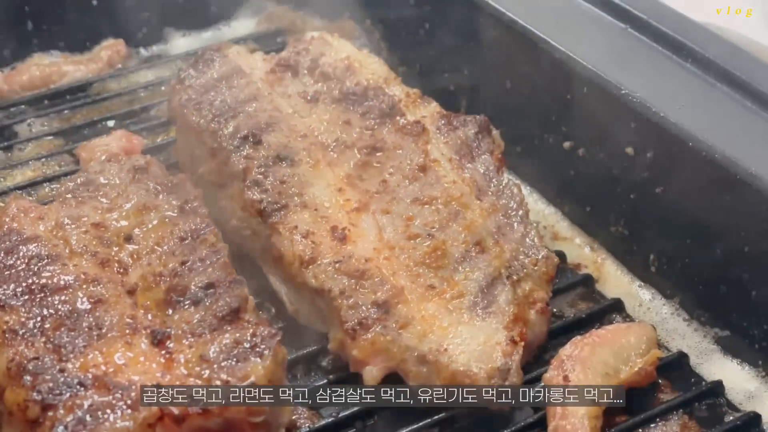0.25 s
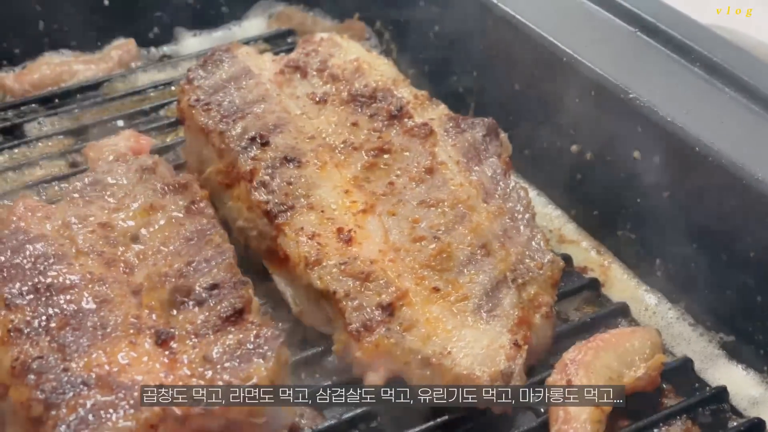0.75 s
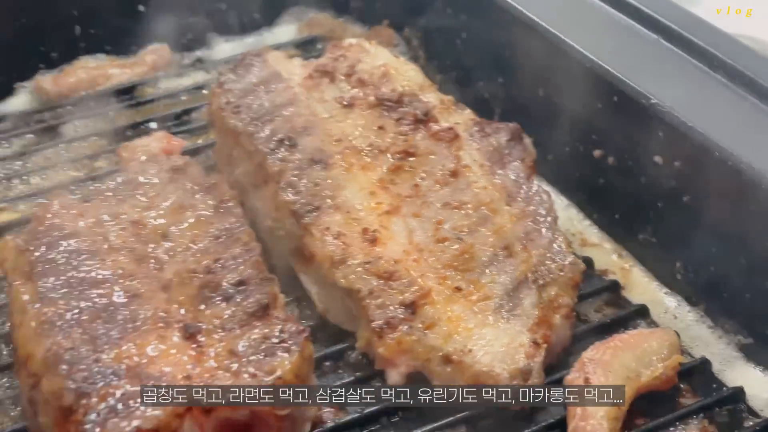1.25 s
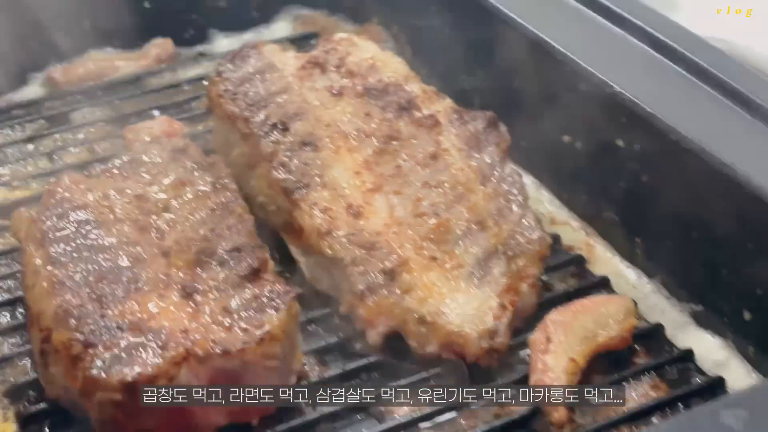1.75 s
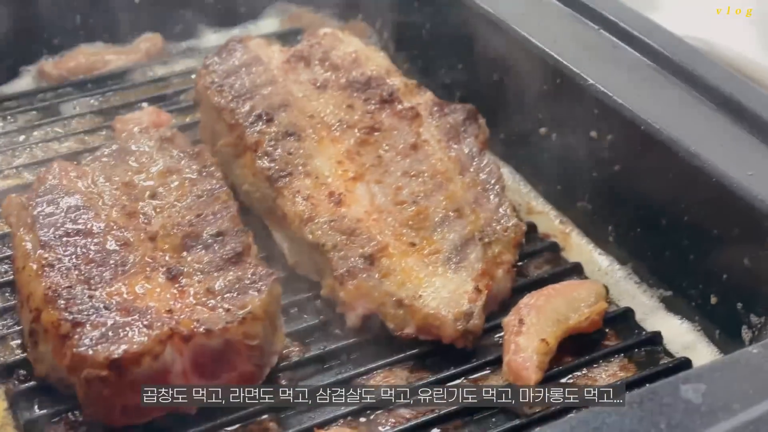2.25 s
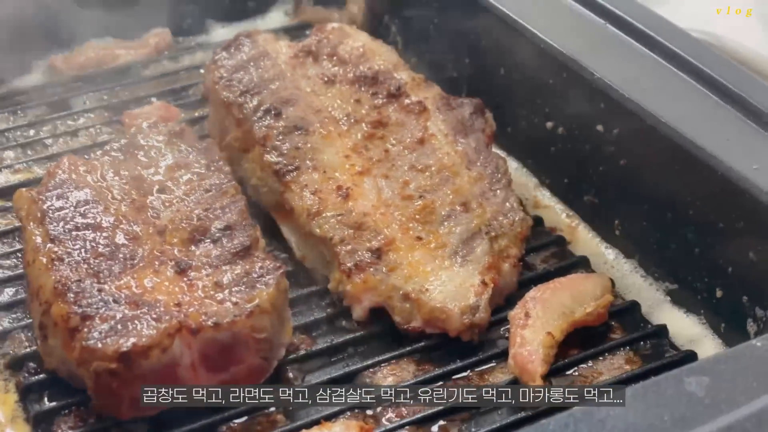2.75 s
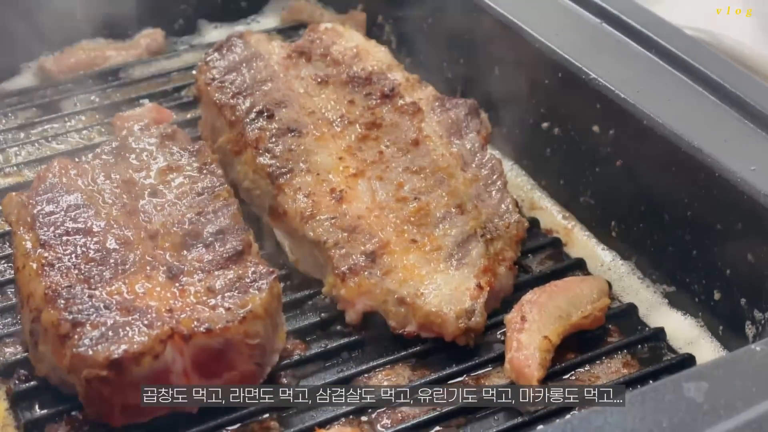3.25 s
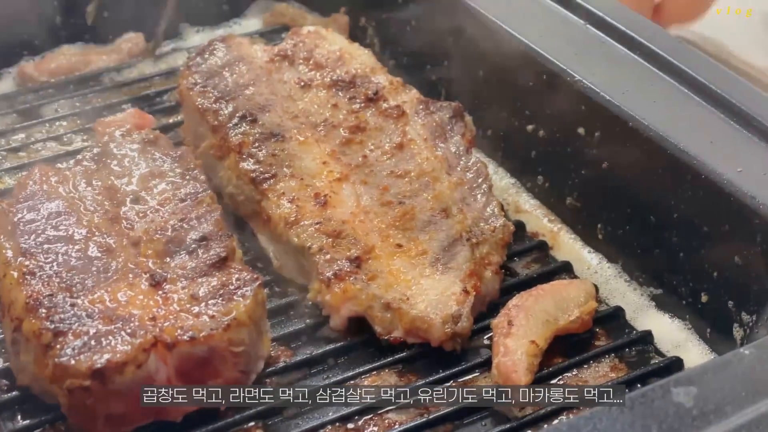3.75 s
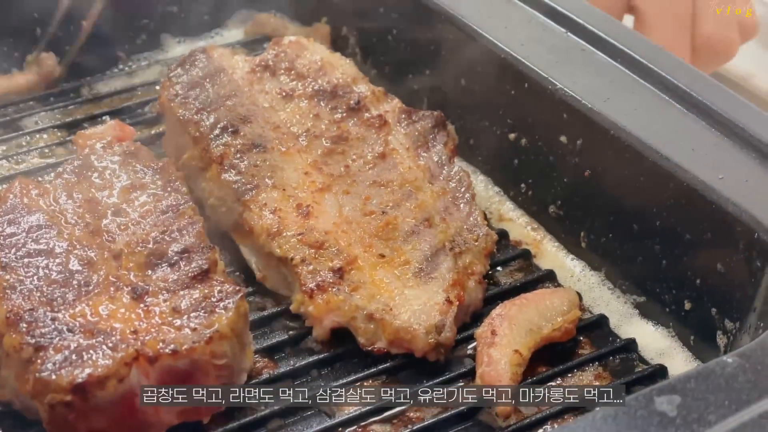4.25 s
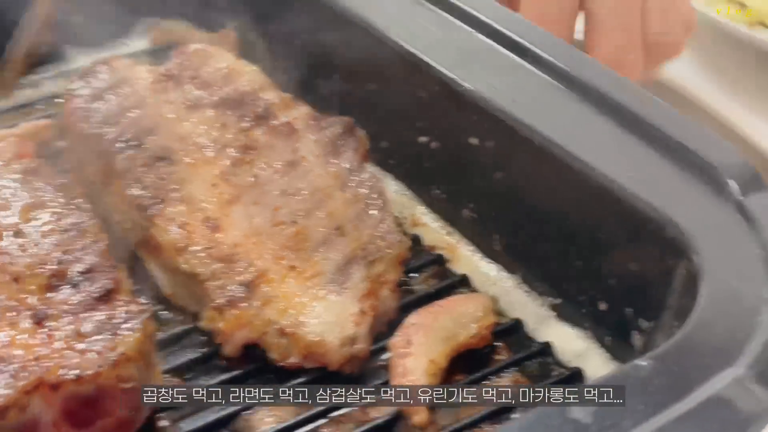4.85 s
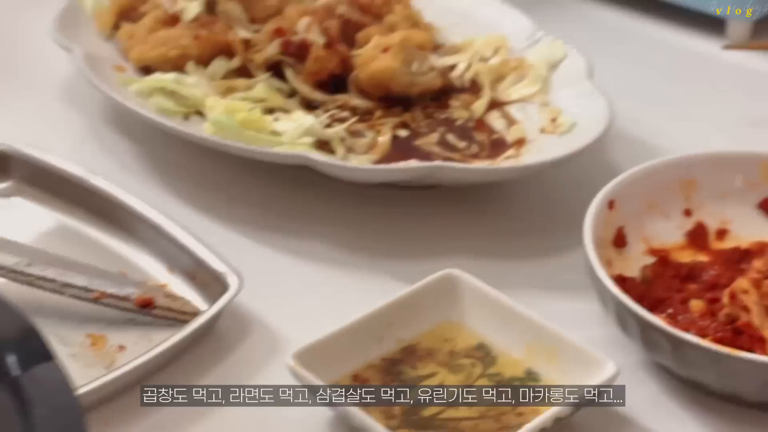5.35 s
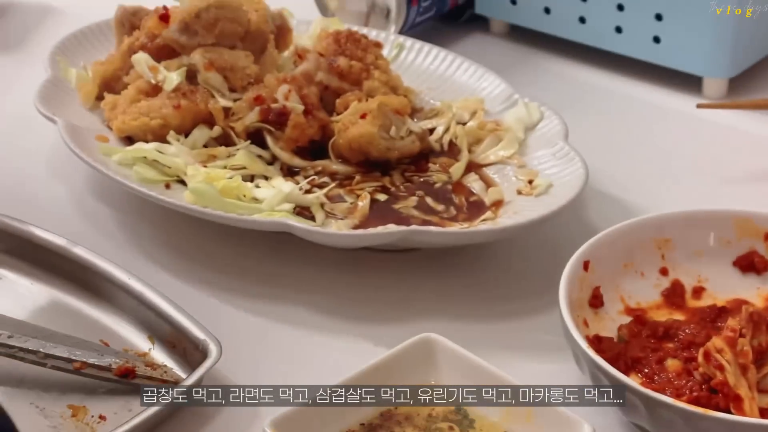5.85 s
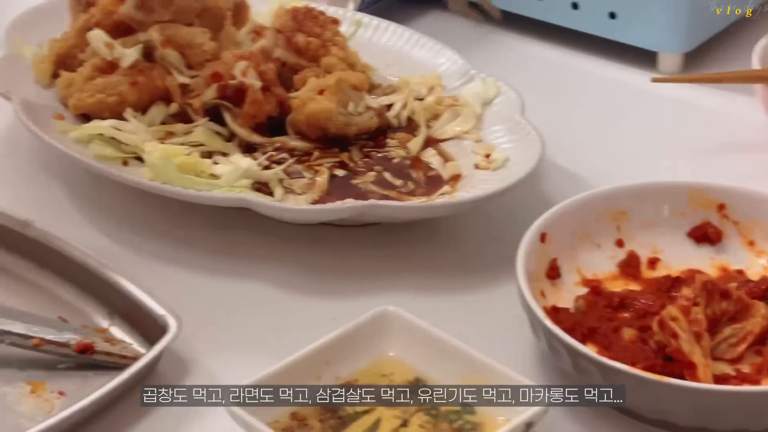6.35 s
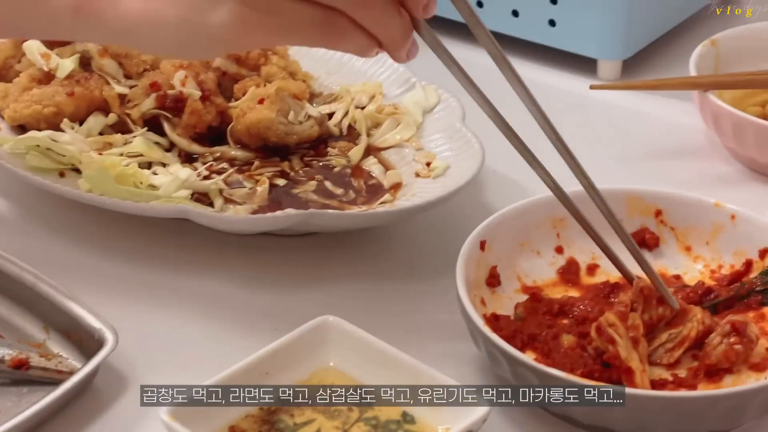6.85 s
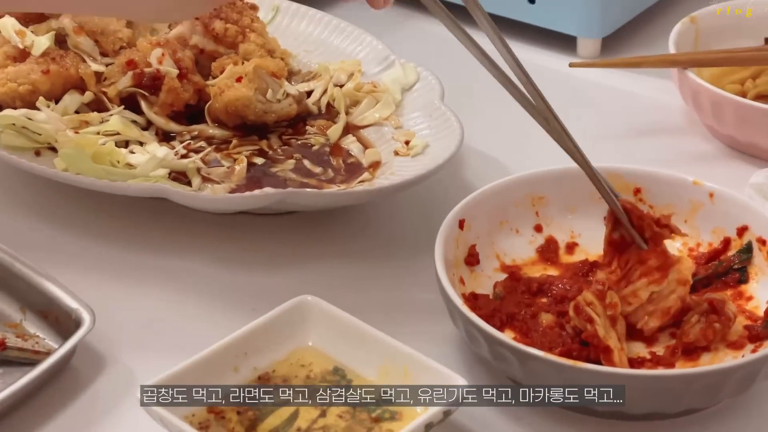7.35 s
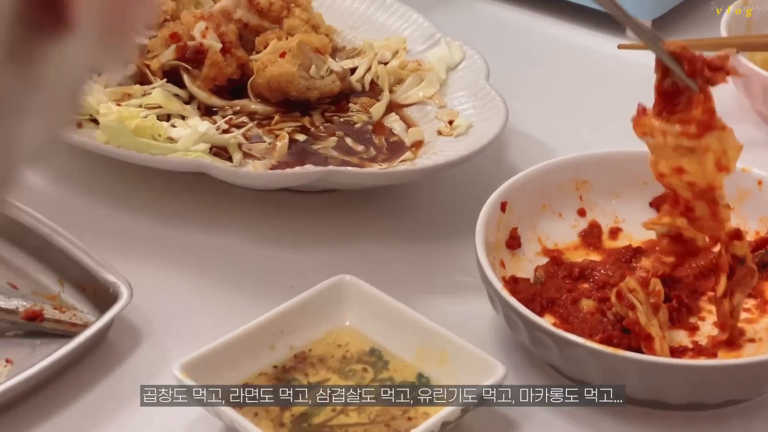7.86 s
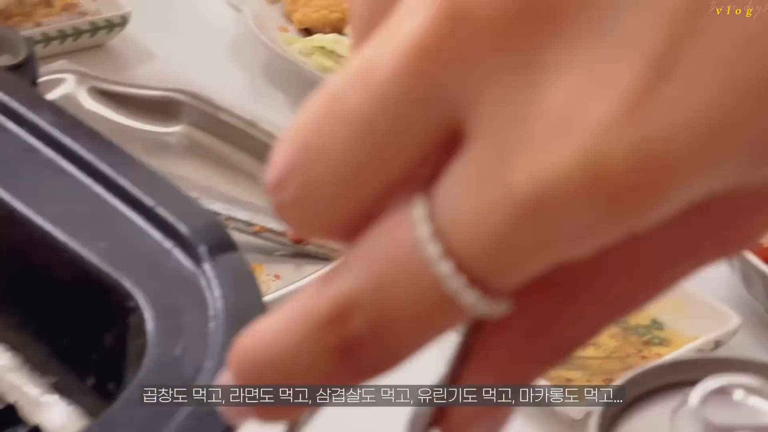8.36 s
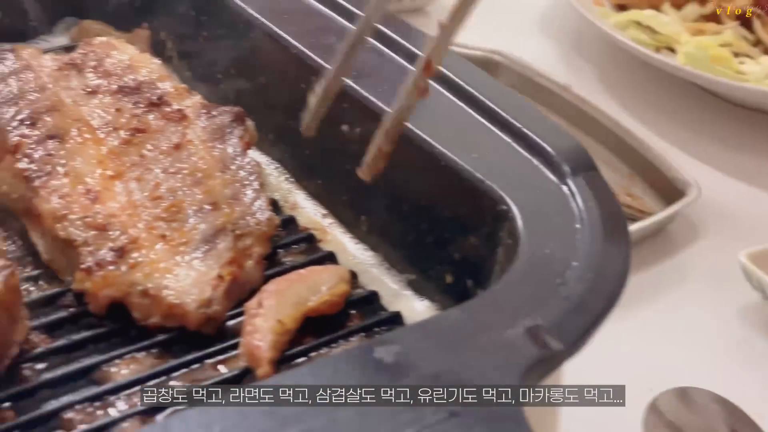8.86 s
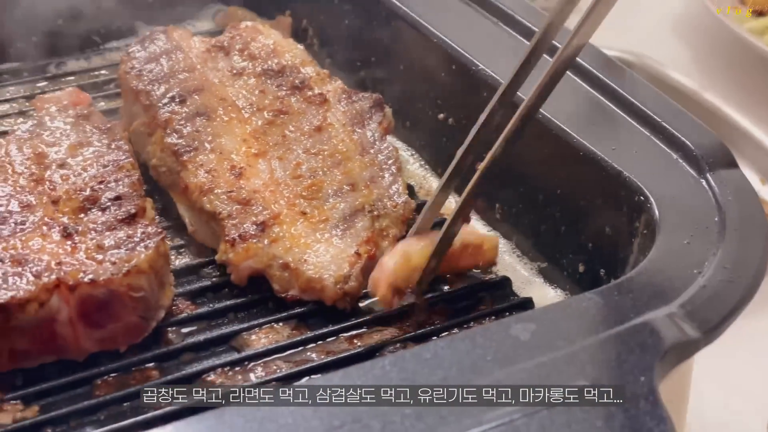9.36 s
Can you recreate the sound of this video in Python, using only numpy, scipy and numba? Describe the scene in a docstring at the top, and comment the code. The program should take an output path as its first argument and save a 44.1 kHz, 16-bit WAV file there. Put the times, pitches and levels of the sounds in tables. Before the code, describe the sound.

Meat sizzles brightly up close on a tabletop grill, fat crackling and popping sharply, with a faint fan hum and a few light metallic ticks.

```python
"""Tabletop grill: meat sizzles close by and is heard facing it, then turned away to the table and back.
Steam hiss is noise; bubbles bursting in hot fat are damped sines: a dense fizz, a crackle, a fine spray.
Loud single pops are resonated cracks; a fan hums as wavering lines over filtered noise.
Knocks ring the tray's modes, chopsticks chatter on the grate's.
The stereo image varies with frequency: near mono at 1.6-2.5 kHz and above 13.2 kHz, wider elsewhere."""
import sys
import numpy as np
from scipy import signal
from scipy.fft import rfft, irfft, next_fast_len
from scipy.io import wavfile
from scipy.ndimage import uniform_filter1d
from numba import njit

SR = 44100
rng = np.random.default_rng(int(sys.argv[2]) if len(sys.argv) > 2 else 0)


def generate_wav(sig):
    """Save sig (samples, or channels by samples) to the path in sys.argv[1] as 16-bit PCM at SR."""
    pcm = np.round(np.clip(np.atleast_2d(sig).T, -1, 1) * 32767).astype(np.int16)
    wavfile.write(sys.argv[1], SR, pcm)


def invert_db(level):
    """Linear amplitude ratio for a level in decibels (20 dB per decade), elementwise."""
    return 10 ** (np.asarray(level, dtype=float) / 20)


N = 422919
TIME = np.arange(N) / SR

# how hard the fat fries: time_s, gain_db
FRY_GAIN = [(0, -28), (1.15, -26.5), (2.4, -29.5), (3.5, -28), (5.1, -28.5), (5.7, -30.5), (8.6, -28.5),
            (9.59, -29.5)]
# hand-held phone turned away from the grill: time_s, turned_0_to_1
TURNED_AWAY = [(0, 0), (4.9, 0), (5.4, 0.68), (8.1, 0.48), (8.9, 0.34), (9.59, 0.1)]
# colour of the sizzle: freq_hz, facing_gain_db, turned_gain_db
SIZZLE_COLOUR = [(200, -39, -34), (460, -20, -29), (620, -13, -11), (830, -15, -46), (1026, -12.5, -13),
                 (1594, -3, -5.5), (1830, -7, -5), (3200, 4, 1), (4070, -1.5, 1), (5240, 0, 2.5),
                 (6600, -0.5, 3), (9800, 0.5, 5), (13330, 3.5, 2), (15900, -10.5, -7)]
# treble flares with spray: centre_s, gain_db, half_length_s (to 1/e of gain_db)
SPRAY_FLURRIES = [(1.018, 6.5, 0.03), (2.997, 5, 0.027), (5.503, 4, 0.21)]
# motor lines of the fan: freq_hz, level_db, waver_rate_hz
FAN_LINES = [(51.3, -60.5, 6.1), (155, -67.5, 8), (239.4, -67.5, 4)]
# spectrum shape of the fan's air rush: freq_hz, relative_db
FAN_AIR_SHAPE = [(30, -25), (45, 1.5), (160, -0.5), (400, -7), (900, -10.5), (2000, -24)]
# loud bursts of fat: peak_s, level_db, pitch_hz, resonance_q
LOUD_POPS = [(0.3757, -13, 3040, 2.5), (0.3836, -11.5, 6850, 3.9), (0.3956, -8.5, 3050, 2.4),
             (0.6034, -8.5, 3120, 2.1), (0.6166, -15, 4150, 1.4), (0.6423, -10.5, 5530, 4.1),
             (0.8393, -11.5, 2930, 1.0), (1.1141, -12, 3540, 2.0), (1.3554, -6, 6300, 2.9),
             (1.5569, -15.5, 1920, 1.2), (1.8412, -13.5, 2760, 1.5), (2.2217, -13.5, 3200, 2.3),
             (2.7807, -13.5, 3070, 3.1), (2.8466, -16, 3770, 2.0), (3.5856, -14, 3460, 1.5),
             (3.7344, -8.5, 3240, 3.4), (3.8155, -14, 3200, 1.0), (3.9803, -9.5, 3020, 1.6),
             (4.1324, -11, 3300, 2.5), (4.3723, -12.5, 3070, 2.3), (4.5505, -15, 3000, 2.0),
             (4.6313, -13, 3680, 1.4), (4.6472, -8.5, 4190, 1.7), (4.6474, -23, 1100, 1.15),
             (4.6567, -12, 3130, 1.6), (4.7109, -14, 3150, 1.8), (5.2038, -7, 3100, 0.91),
             (5.4598, -5, 6110, 1.9), (5.479, -13, 6590, 3.3), (5.6694, -9, 6900, 5.3),
             (5.678, -14, 2600, 0.82), (5.7366, -11, 3710, 1.9), (5.9252, -13, 3500, 1.2),
             (6.21, -12.5, 3780, 0.81), (6.3438, -2, 6270, 1.9), (6.3922, -12, 3080, 2.5),
             (6.4953, -5, 6200, 1.4), (6.5153, -9, 6930, 4.3), (6.5661, -2.5, 4700, 1.3),
             (6.6344, -13.5, 4240, 2.2), (6.7698, -9.5, 3660, 1.3), (6.9845, -3, 6620, 1.5),
             (7.0091, -9, 4600, 0.97), (7.1274, -10.5, 3570, 1.4), (7.1949, -16.5, 2520, 2.5),
             (7.2644, -7, 5440, 2.9), (7.3996, -11.5, 2270, 1.1), (7.4414, -8, 3320, 1.0),
             (8.062, -6, 3620, 1.2), (8.5565, -7, 6960, 2.9), (8.9588, -13.0, 3370, 2),
             (9.0872, -12, 3380, 2.2), (9.2344, -10.5, 4930, 2.7), (9.2735, -11, 3120, 2.1),
             (9.3186, -8, 3100, 1.1)]
# droplets flashing to steam: peak_s, level_db
STEAM_SNAPS = [(0.9986, -5), (1.021, -6), (2.2667, 0), (2.5485, -7), (2.977, -5.5), (3.042, -4),
               (3.3532, -5), (3.8299, -4), (4.2938, -4), (4.8454, -5), (6.7698, -10), (8.041, -6),
               (8.9588, -4), (9.2339, -3), (9.3007, -5), (9.395, -7), (9.436, -6)]
# knocks on the grill tray: start_s, level_db
TRAY_KNOCKS = [(2.219, -40.5), (5.15, -31), (9.222, -30)]
# modes of the tray: freq_hz, relative_db, t60_s
TRAY_MODES = [(451, -7, 0.16), (522, -0.5, 0.04), (1220, -1.5, 0.042)]
# chopstick chatter: start_s, level_db, strongest_hz, length_ms
CHATTER = [(2.7028, -10.5, 4680, 17), (3.496, -9.5, 4150, 6.3), (3.616, -15, 3100, 14),
           (3.853, -13, 3400, 8.1), (5.149, -17.5, 3100, 4.4), (9.221, -11, 3400, 5)]
# modes of the grate: freq_hz, relative_db, t60_s
GRATE_MODES = [(2040, -1, 0.043), (2780, 2, 0.02), (3100, -0.5, 0.015), (3400, 3, 0.018), (4150, -5, 0.02),
               (4680, 3, 0.03), (5550, 1.5, 0.014)]
# stereo image by frequency, near mono at 1.6-2.5 kHz and above 13.2 kHz, wider elsewhere:
# freq_hz, right_lead_rad, left_minus_right_db, unshared_gain_db
STEREO_IMAGE = [(40, 0, 1, -24), (150, 0, 1, -15), (450, -.3, 2, -9), (950, -.6, 7, -10),
                (1350, -.2, 3, -16), (1600, 0, 0, -40), (2500, 0, 0, -40), (2900, -.5, 0, -18),
                (3300, -.65, 0, -16), (5250, -.55, 0, -15), (5700, 1.6, 0, -14), (6800, .8, 0, -14),
                (7500, 2.3, 0, -14), (8200, 2.45, 0, -14), (8700, np.pi, 0, -18), (9200, 3.7, 0, -16),
                (13000, 5.8, 0, -16), (13200, 2 * np.pi, 0, -40), (16000, 2 * np.pi, 0, -40)]

TREBLE_FACING_DB, TREBLE_TURNED_DB = 1.5, -2.5  # treble gain within the sizzle
FAN_AIR_DB = -54.5  # rms at 7 s
SMALL_POPS, SMALL_POP_Q = 230, 2.6
SMALL_POP_DB, SMALL_POP_SPREAD_DB = -21.5, 3
SMALL_POP_HZ, SMALL_POP_SPREAD_OCTAVES = 3200, .12
SMALL_POP_TURNED_DB = -6  # change with the phone turned fully away
SNAP_OVER_POP_DB = -6.5  # treble snap with every pop
SPLUTTER = 0.03  # splash noise against the unit crack
CLACK_DB, CLACK_DECAY_MS = 5, 5.8  # gain below 1500 Hz, decay to 1/e
CLATTER_DB = -12  # noise gain against the unit peak of a rattle


def level(x, db):
    """Scale to an rms level."""
    return x * invert_db(db) / np.sqrt(np.mean(x ** 2))


def response(x, hz, db, turn_rad=0):
    """Filter the last axis by dB and phase interpolated over log frequency."""
    size = next_fast_len(x.shape[-1])
    log_hz = np.log(hz)
    at = np.log(np.arange(size // 2 + 1) * SR / size + 1)
    phase = np.interp(at, log_hz, turn_rad + 0 * log_hz)
    gain = invert_db(np.interp(at, log_hz, db)) * np.exp(1j * phase)
    return irfft(rfft(x, size) * gain, size)[..., :x.shape[-1]]


def walk(rate_hz):
    """Random levels held 1 / rate_hz s, smoothed twice, scaled to unit spread."""
    hold = int(SR / rate_hz)
    steps = np.repeat(rng.standard_normal(N // hold + 1), hold)
    steps = uniform_filter1d(uniform_filter1d(steps, hold), hold)[:N]
    return steps / steps.std()


@njit
def rings(start, hz, t60_s, size, length):
    """Sum of damped sines, each from its own start sample."""
    out = np.zeros(length)
    for k in range(len(start)):
        pole = np.exp(2j * np.pi * hz[k] / SR - np.log(1000) / (t60_s[k] * SR))
        z = size[k] + 0j
        for i in range(int(start[k]), min(length, int(start[k] + t60_s[k] * SR))):
            out[i] += z.imag
            z *= pole
    return out


def ring_all(start, hz, t60_s, size):
    """Damped sines for every combination of the broadcast arrays."""
    rows = np.broadcast_arrays(start, hz, t60_s, size)
    return rings(*(row.ravel().copy() for row in rows), N)


def burst(start_s, db, decay_ms):
    """Noise that starts at once and dies away exponentially."""
    decay = np.exp(-abs(TIME - start_s) * 1000 / decay_ms)
    return invert_db(db) * rng.standard_normal(N) * (TIME >= start_s) * decay


def bubbles(count, low_hz, spread_db, cycles, busy, after_ms, after_db):
    """Bursting bubbles ring as damped sines, crowded where busy is high; three splashes trail each."""
    when, pitch, luck, damp = rng.random((count, 4)).T
    crowd = np.cumsum(busy)
    start = np.searchsorted(crowd, when * crowd[-1]) * 1.
    hz = low_hz + (16500 - low_hz) * pitch
    t60_s = cycles * (.5 + 2.44 * damp) / hz
    # short rings carry less energy, so they start stronger
    size = invert_db(-spread_db * np.log(1 - .992 * luck)) / np.sqrt(t60_s)
    lag = np.vstack([0 * when, rng.exponential(size=(3, count))])
    trail = np.where(lag > 0, invert_db(after_db - 1.7 * lag), 1) * rng.choice([-1, 1], lag.shape)
    return level(ring_all(start + lag * after_ms * SR / 1000, hz, t60_s, size * trail), 0)


def sizzle():
    """Steam hiss, fizz, crackle and fine spray, recoloured as the phone turns away."""
    fry_db = np.interp(TIME, *np.transpose(FRY_GAIN))
    away = np.clip(np.interp(TIME, *np.transpose(TURNED_AWAY)), 0, 1)
    flare_db = sum(db * np.exp(-((TIME - s) / half_s) ** 2) for s, db, half_s in SPRAY_FLURRIES)
    treble_db = (1 - away) * TREBLE_FACING_DB + away * TREBLE_TURNED_DB + flare_db

    boil = walk(28)  # shared by steam and crackle
    steam = level(rng.standard_normal(N) * invert_db(.6 * boil), -4.5)
    fizz = bubbles(count=20000, low_hz=294, spread_db=3.0, cycles=2.84,
                   busy=invert_db(2.5 * walk(40)), after_ms=1.5, after_db=-5.5)
    crackle = bubbles(count=2500, low_hz=1390, spread_db=3.0, cycles=3.8,
                      busy=invert_db(2.5 * boil), after_ms=2.5, after_db=-8.5)
    spray = bubbles(count=2500, low_hz=6640, spread_db=3.5, cycles=4.6,
                    busy=invert_db(3.5 * walk(15)), after_ms=1.5, after_db=-3.5)
    fat = steam + invert_db(-3.0) * fizz + invert_db(-9.5) * crackle + invert_db(-5.0) * spray

    hz, facing_db, turned_db = np.transpose(SIZZLE_COLOUR)
    heard = (1 - away) * response(fat, hz, facing_db) + away * response(fat, hz, turned_db)
    treble = response(heard, [7500, 9500], [-60, 0])
    return invert_db(fry_db) * (heard - treble + invert_db(treble_db) * treble)


def fan():
    """Motor lines that swell and shrink over a low rush of air."""
    out = level(response(rng.standard_normal(N), *np.transpose(FAN_AIR_SHAPE)), FAN_AIR_DB)
    for hz, db, rate_hz in FAN_LINES:
        waver = 1 + .15 * (walk(rate_hz) + 1j * walk(rate_hz))
        line = (waver * np.exp(2j * np.pi * hz * TIME)).real
        out = out + level(line, db)
    # grows 0.27 dB per second
    return out * invert_db(0.27 * (TIME - 7.0))


def small_pops():
    """Random smaller bubbles as rows of peak_s, level_db, pitch_hz, resonance_q."""
    chance = rng.standard_normal((SMALL_POPS, 2))
    when_s = rng.random(SMALL_POPS) * N / SR
    turned_db = SMALL_POP_TURNED_DB * np.interp(when_s, *np.transpose(TURNED_AWAY))
    db = SMALL_POP_DB + turned_db + SMALL_POP_SPREAD_DB * chance[:, 0]
    hz = SMALL_POP_HZ * 2 ** (SMALL_POP_SPREAD_OCTAVES * chance[:, 1])
    return np.c_[when_s, db, hz, np.full(SMALL_POPS, SMALL_POP_Q)]


def pops():
    """Bubbles crack once and ring briefly at their own pitch; each crack and droplet snaps in the treble."""
    out = np.zeros(N + 1024)
    t_ms = np.arange(1024) * 1000 / SR
    bursts = [*LOUD_POPS, *small_pops()]
    pop_snaps = [(s, db + SNAP_OVER_POP_DB) for s, db, _, _ in bursts]
    rows = [(s, db, 12700, 3.6, .7) for s, db in [*STEAM_SNAPS, *pop_snaps]]
    rows += [(*row, 1.2) for row in bursts]
    for (s, db, hz, q, ms), noise in zip(rows, rng.standard_normal((len(rows), 1024))):
        crack = 1. * (np.arange(1024) == int(ms * SR / 2000))
        # faint splashes swell from just before the crack and trail it
        swell = t_ms / ms * np.exp(1 - t_ms / ms) + .4 * np.exp(-t_ms / ms / 4)
        splutter = crack + SPLUTTER * noise * swell
        resonance = signal.iirpeak(hz, max(q, .5), fs=SR)
        narrow = signal.lfilter(*resonance, signal.lfilter(*resonance, splutter))
        broad = signal.lfilter(*signal.iirpeak(hz / 2, .4, fs=SR), crack)
        ring = 0.14 * broad + narrow
        # the peak lands on s
        start = max(int(s * SR) - abs(ring).argmax(), 0)
        out[start:][:1024] += invert_db(db) * ring / abs(ring).max()
    return response(out[:N], [400, 900], [-15, 0])


def knocks():
    """Light blows ring the tray's low modes inside a dull clack; the thin tray radiates no bass."""
    start_s, db = np.transpose(TRAY_KNOCKS)[:, :, None]
    hz, mode_db, t60_s = np.transpose(TRAY_MODES)[:, None, :]
    vary_db = 2 * rng.standard_normal((len(TRAY_KNOCKS), len(TRAY_MODES)))
    ring = ring_all(start_s * SR, hz, t60_s, invert_db(db + mode_db + vary_db))
    noise = sum(burst(*row, CLACK_DECAY_MS) for row in TRAY_KNOCKS)
    clack = response(noise, [1500, 3000], [CLACK_DB, -20])
    return response(ring + clack, [250, 400], [-20, 0])


def rattles():
    """Chopsticks chatter on the grate: eight tiny blows ring the modes near a pitch, in noisy clatter."""
    out = 0
    hz, mode_db, t60_s = np.transpose(GRATE_MODES)
    for (s, db, near_hz, ms), chance in zip(CHATTER, rng.random((len(CHATTER), 8, len(GRATE_MODES)))):
        octaves = abs(np.log2(hz / near_hz))
        distance_db = np.minimum(60 * octaves, 4) + 6 * octaves
        when = np.maximum(np.arange(8)[:, None] + chance - 1, 0) / 7  # share of the length
        size = invert_db(mode_db - .7 * ms * np.sqrt(when) - distance_db) * (.7 + .3 * chance)
        # the blows fall in step with the strongest mode
        late_s = np.round(when * ms / 1000 * near_hz) / near_hz
        rattle = ring_all((s + late_s) * SR, hz * (1 + .02 * (chance - .5)), t60_s, size)
        noise = burst(s, CLATTER_DB, ms / 2 + 3)
        clatter = signal.lfilter(*signal.iirpeak(3600, 1, fs=SR), noise)
        out = out + invert_db(db) * (rattle / abs(rattle).max() + clatter)
    return response(out, [900, 1800], [-25, 0])


def scene():
    """Sound shared by both channels, and unrelated steady sound that widens them."""
    shared = sizzle() + fan() + pops() + rattles() + knocks()
    unshared = sizzle() + fan()
    return np.array([shared, unshared])


def low_pass(x):
    """Removes everything above the highest recorded frequency."""
    return signal.sosfilt(signal.butter(12, 16190, fs=SR, output="sos"), x)


def record(dry):
    """Stereo image by phase twist, level tilt and opposite-signed unshared sound, then a top cut."""
    hz, turn_rad, tilt_db, apart_db = np.transpose(STEREO_IMAGE)
    shared, unshared = dry
    apart = response(unshared, hz, apart_db)
    left = response(shared + apart, hz, tilt_db / 2, -turn_rad / 2)
    right = response(shared - apart, hz, -tilt_db / 2, turn_rad / 2)
    both = response(np.array([left, right]), [15700, 16000], [0, -40])
    return low_pass(both)


dry = scene()
out = record(dry)
generate_wav(out)
```